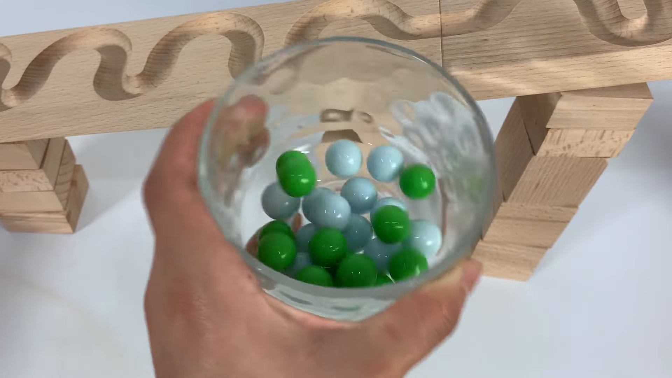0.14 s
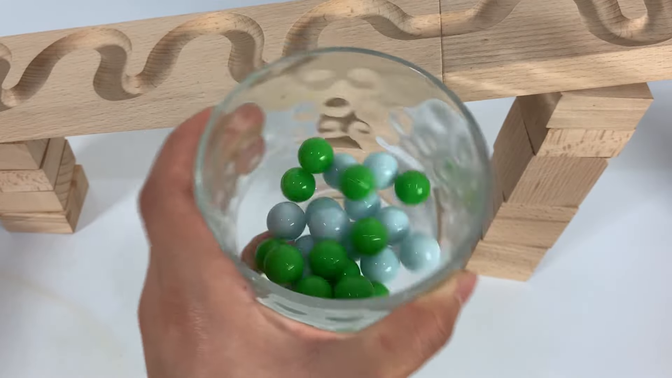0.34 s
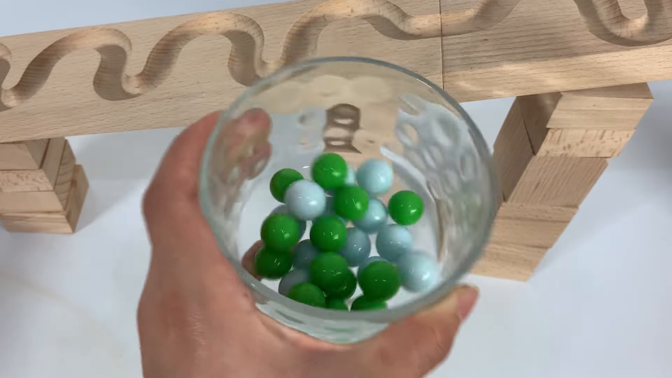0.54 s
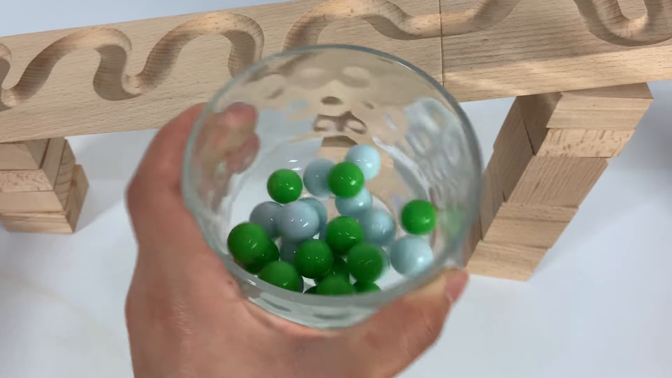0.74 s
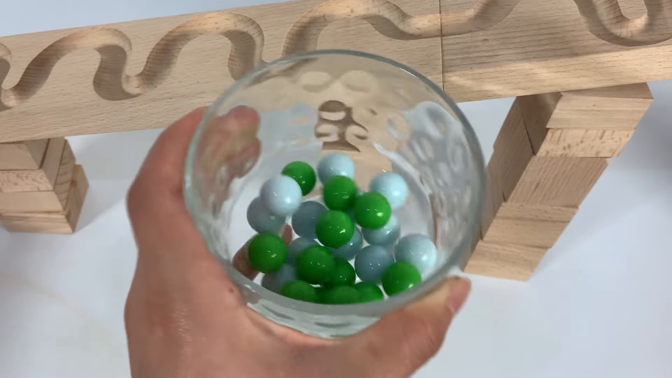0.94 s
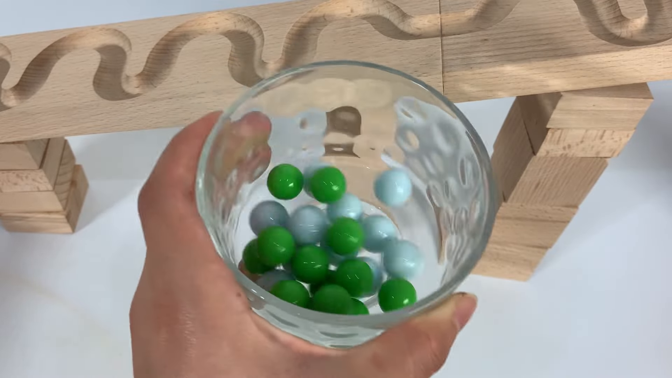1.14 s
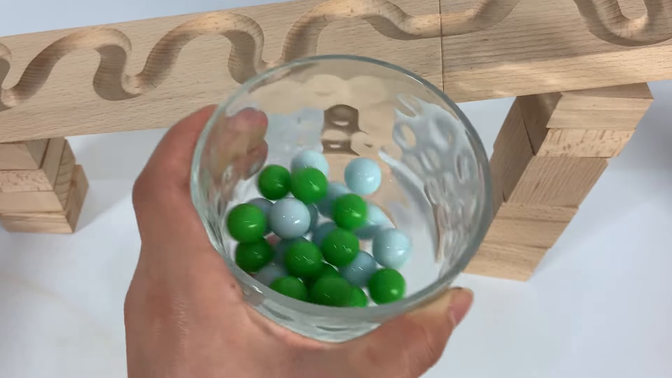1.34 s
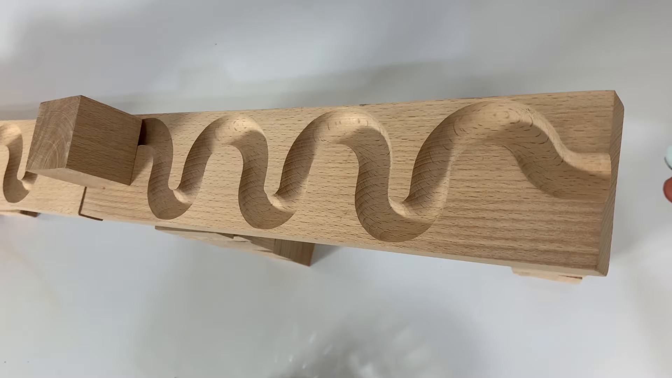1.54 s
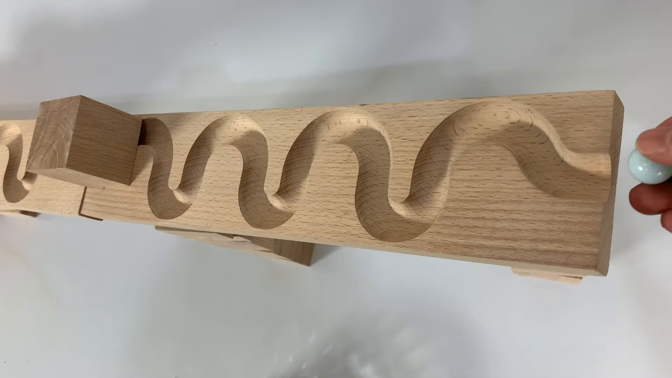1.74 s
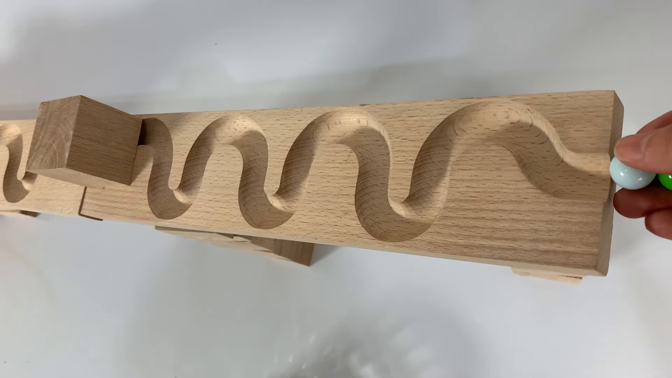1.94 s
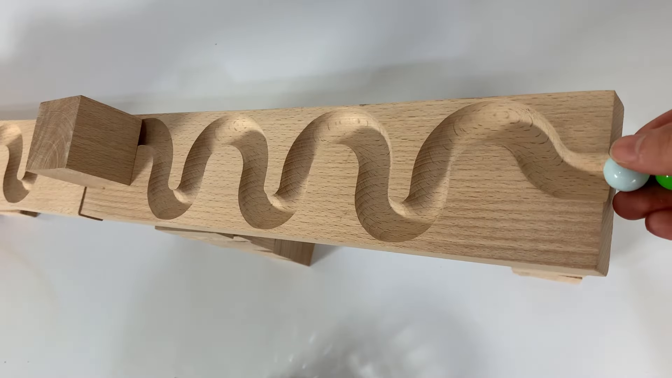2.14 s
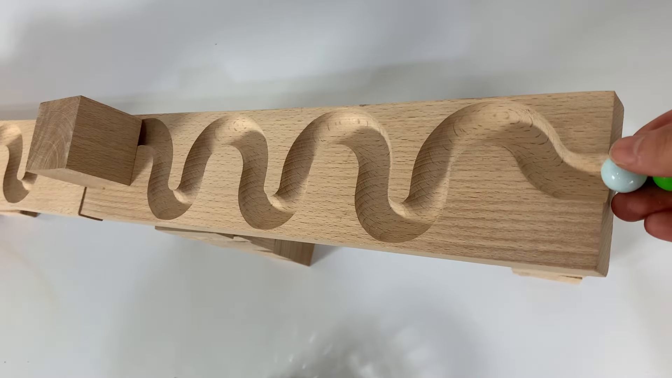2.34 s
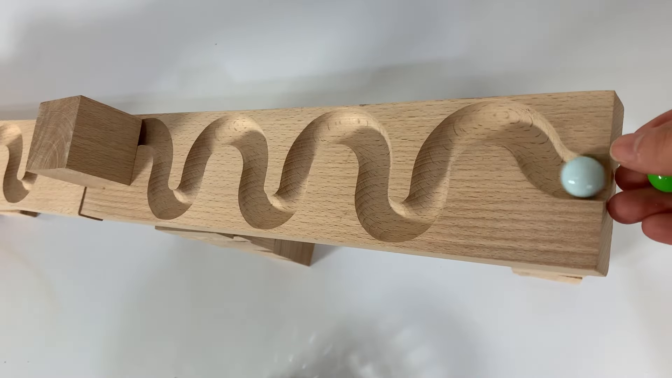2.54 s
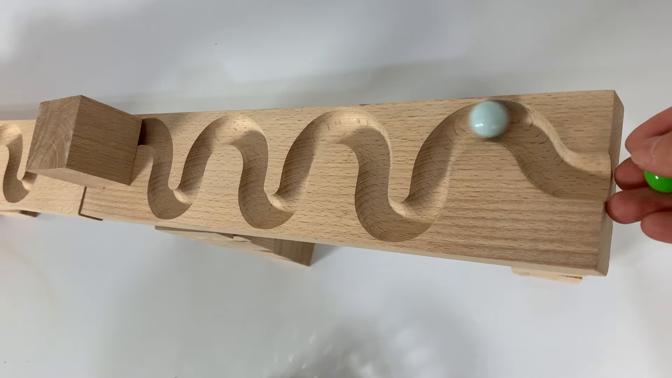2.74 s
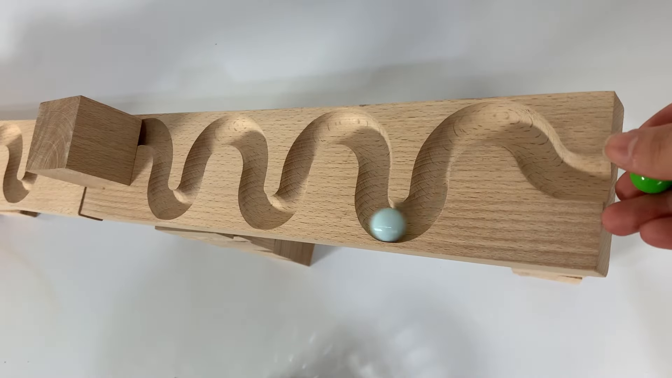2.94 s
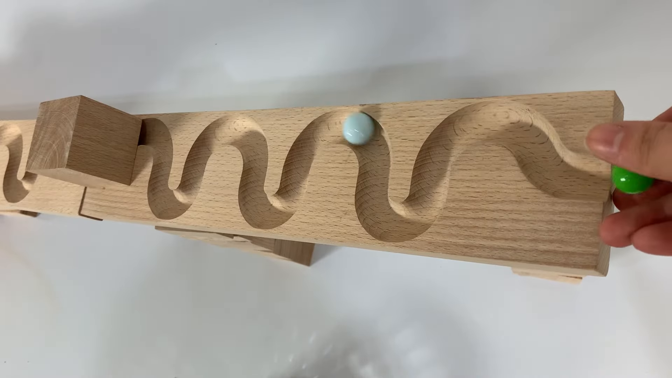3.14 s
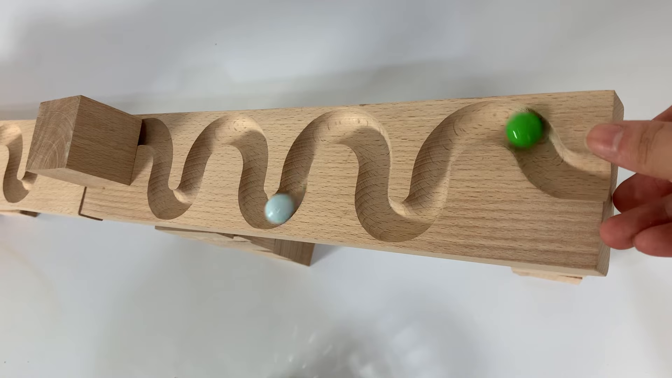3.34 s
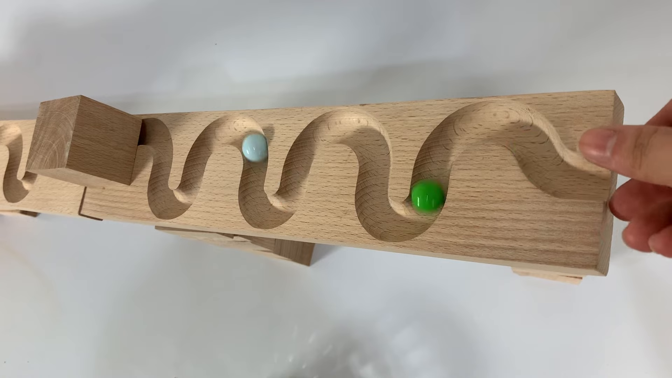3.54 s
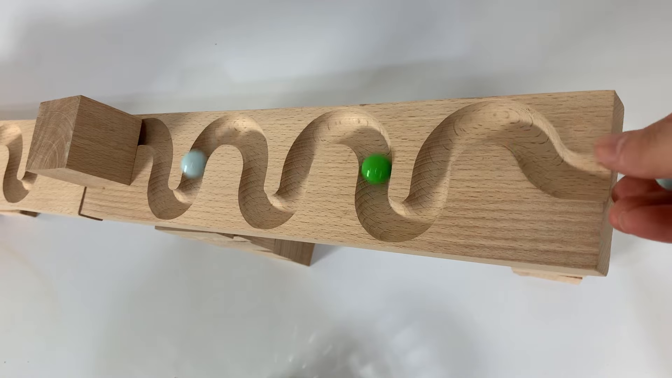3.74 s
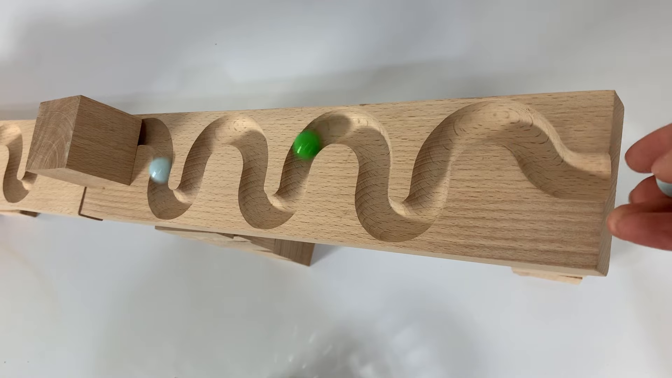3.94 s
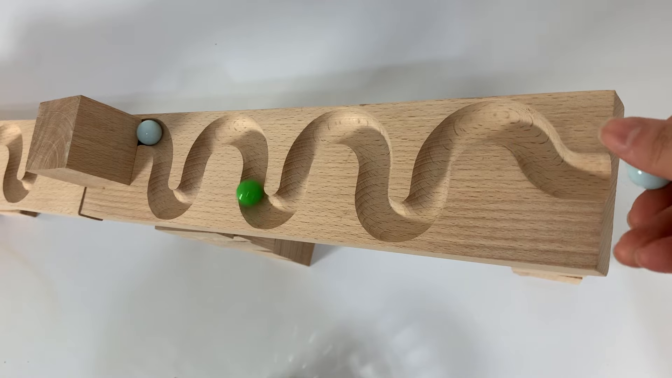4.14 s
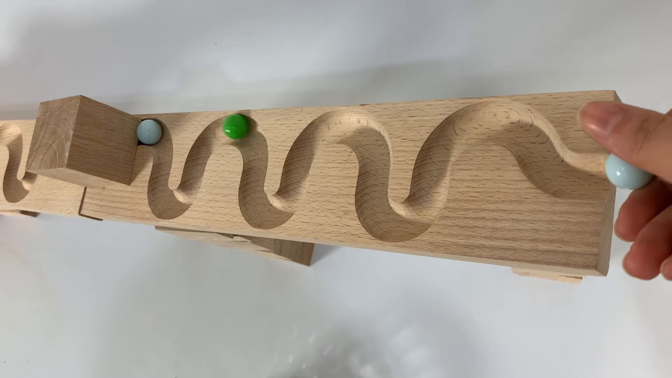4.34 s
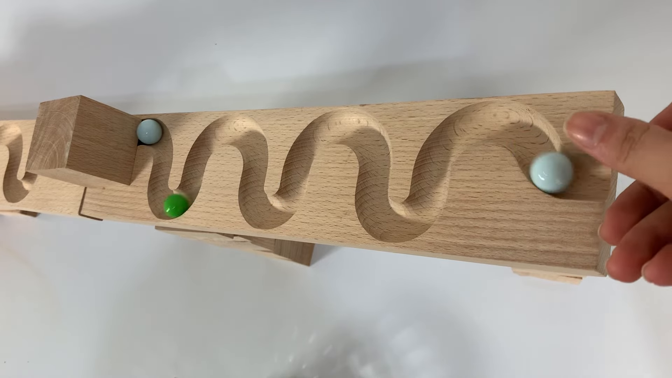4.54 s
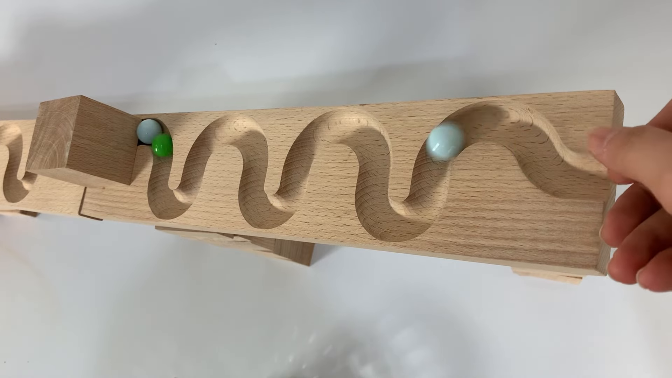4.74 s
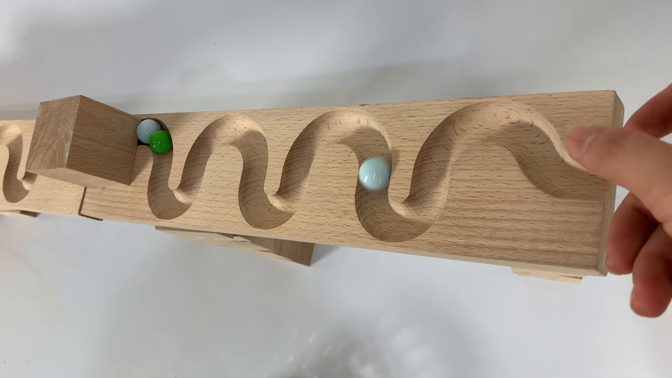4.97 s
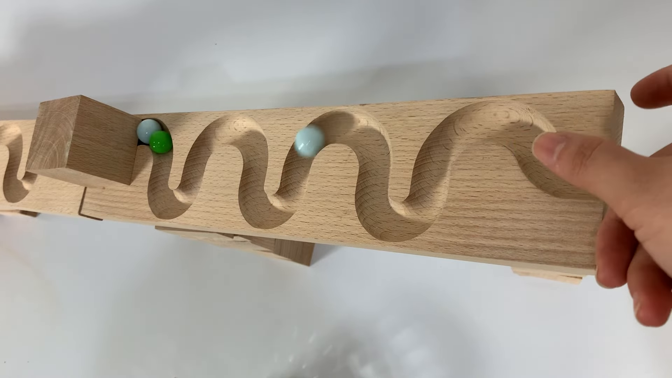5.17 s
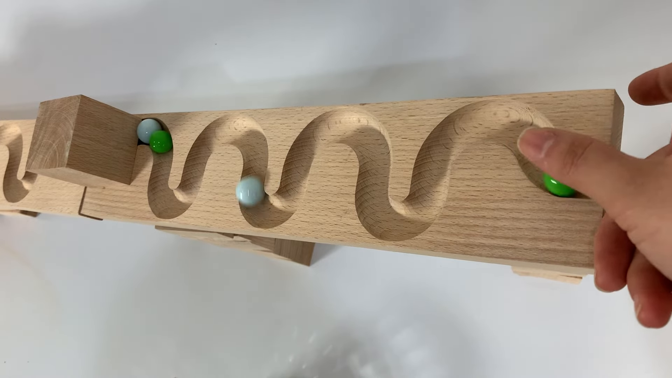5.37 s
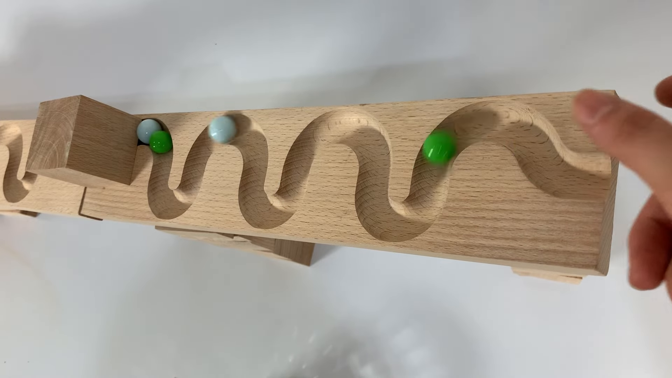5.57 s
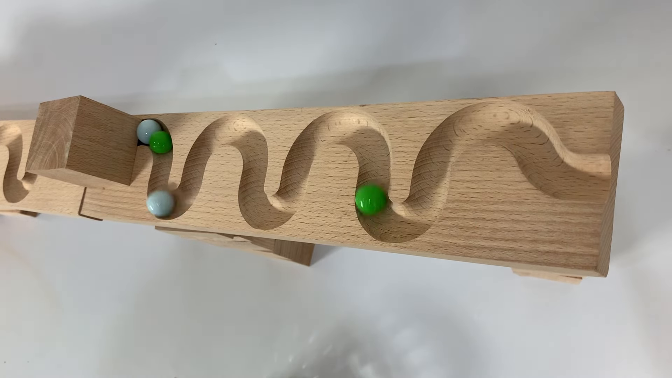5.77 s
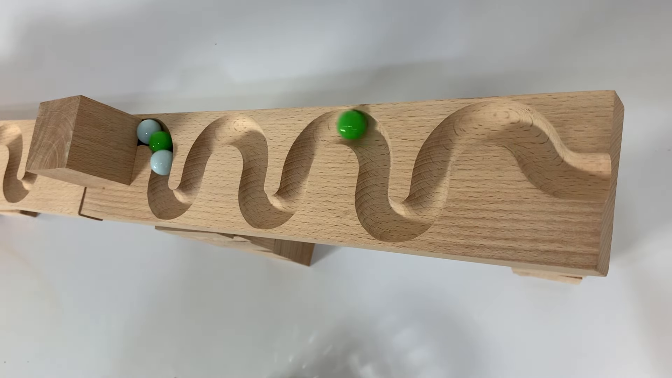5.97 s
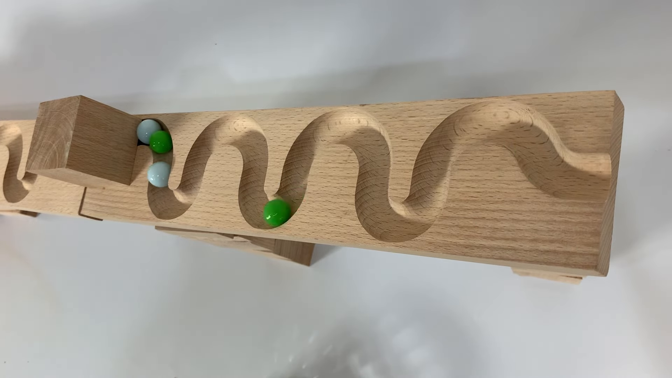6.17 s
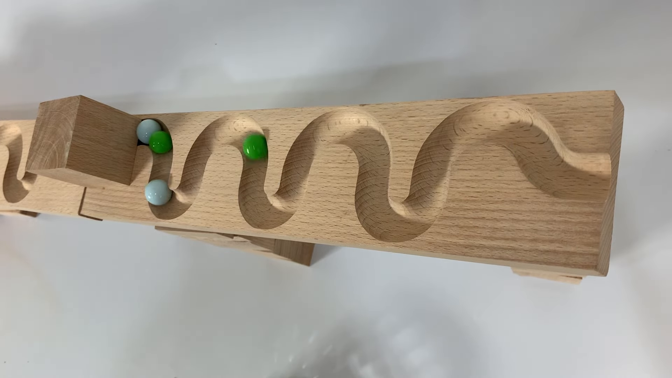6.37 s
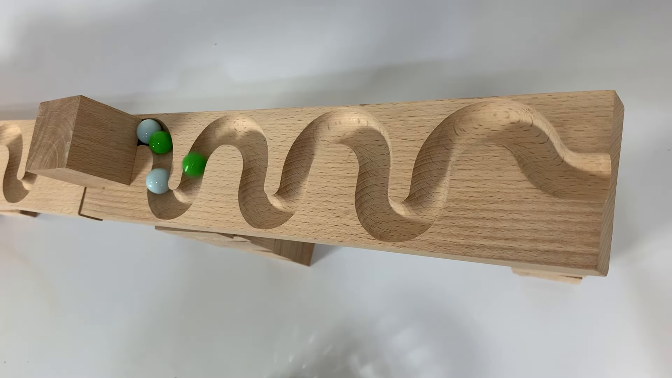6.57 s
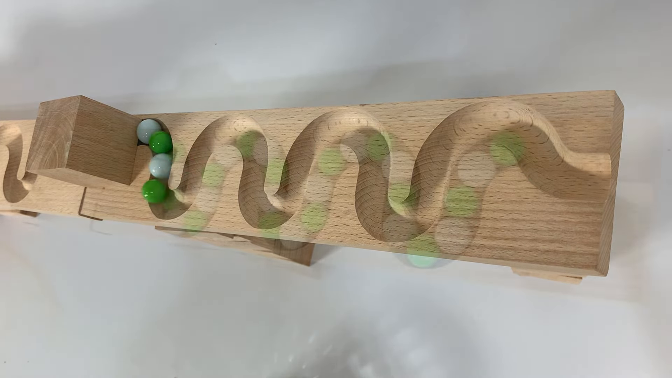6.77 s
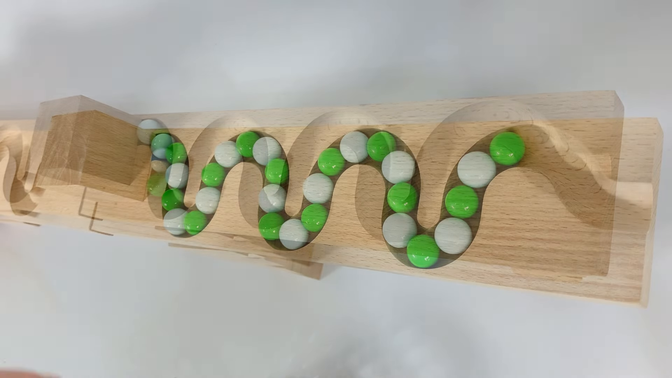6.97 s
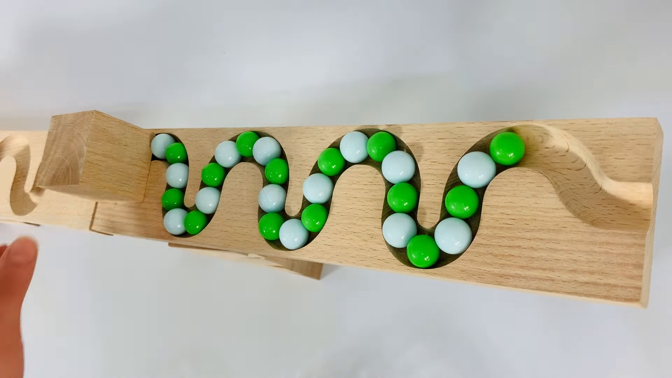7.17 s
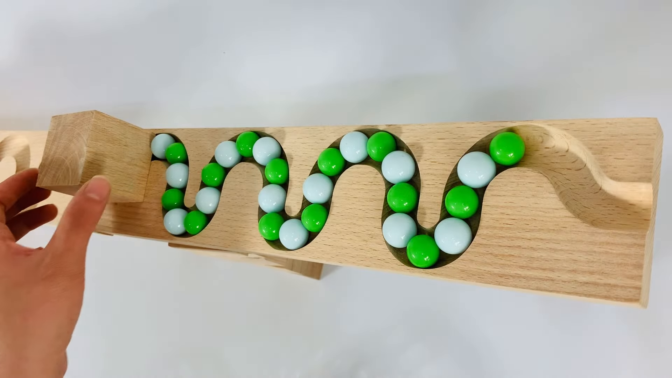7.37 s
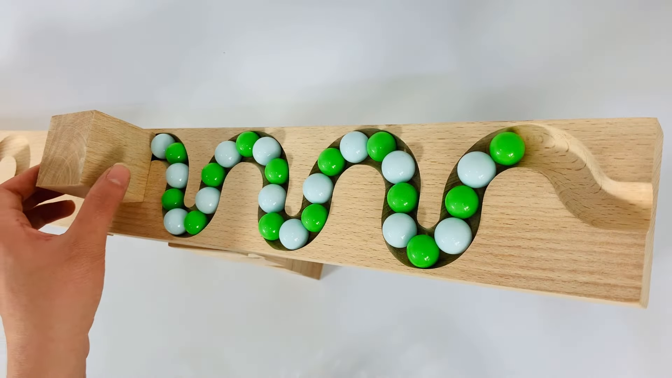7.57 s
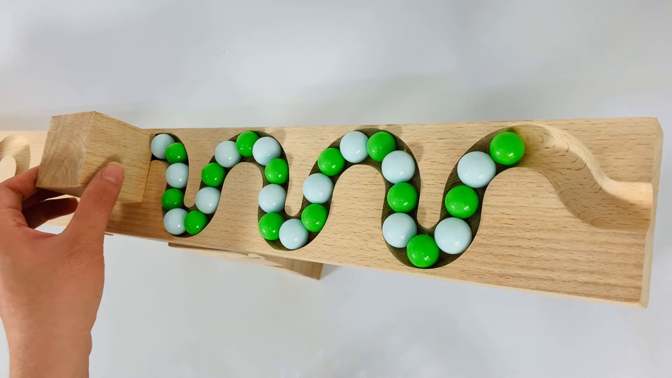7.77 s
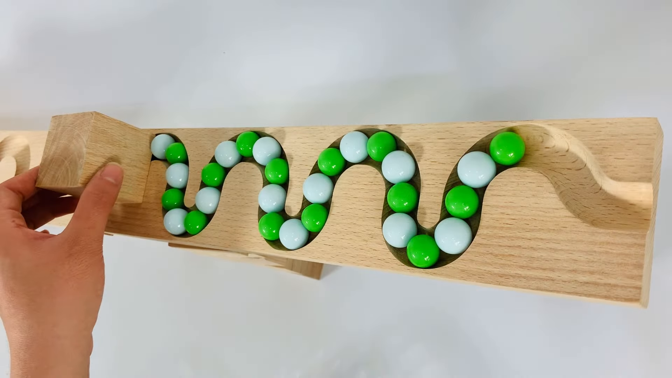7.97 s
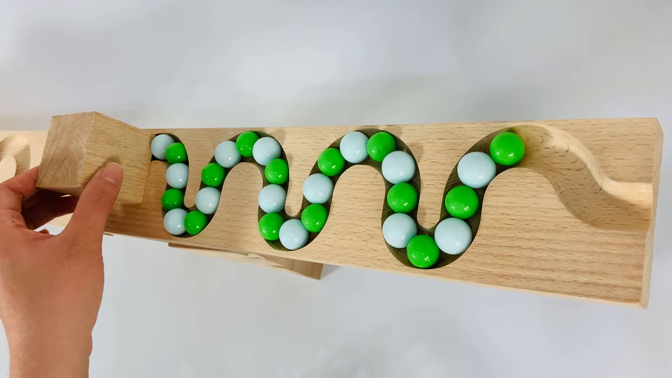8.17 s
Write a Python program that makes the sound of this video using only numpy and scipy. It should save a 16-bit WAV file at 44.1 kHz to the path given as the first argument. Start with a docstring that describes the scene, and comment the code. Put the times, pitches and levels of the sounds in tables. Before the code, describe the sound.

Glass marbles swirl in a hand-held tumbler with a bright, dense, pulsing rattle and sharp clinks. After a second and a half it stops, and marbles run one by one down a winding groove in a wooden board, rumbling and knocking at the bends, with hard clacks at the stop block. A small hard room, close stereo microphone, faint low rumble, nearly quiet at the end.

```python
"""Glass marbles clink and clatter as they are swirled in a hand-held drinking glass; then they run one by one
down a winding groove in a wooden board, knocking at its bends and clacking into marbles at the stop block.
Glass and wood are banks of decaying modes struck by clicks and noise; marble on marble is a short noise burst.
A small hard room, made of decaying noise bands, rings behind the hits, and a low rumble lies under all."""
import sys
import numpy as np
from scipy import signal
from scipy.fft import rfft, irfft, next_fast_len
from scipy.io import wavfile
from scipy.ndimage import uniform_filter1d

SR = 44100
rng = np.random.default_rng(int(sys.argv[2]) if len(sys.argv) > 2 else 0)


def transcribe(u):
    """Save the signal u as a 16-bit wav file named by the first command-line argument.

    u: samples, shape (n,) or (channels, n), limited to [-1, 1]; the rate is SR.
    q: integer samples, one column per channel.
    """
    v = np.clip(np.atleast_2d(u).T, -1, 1)
    q = np.round(v * 32767).astype(np.int16)
    wavfile.write(sys.argv[1], SR, q)


N = 362061
SIZE = next_fast_len(N)   # transform length in samples

# Loudest blows of marbles against the groove.
# Each row: time in seconds, relative level in dB, hardness (tilt of the blow's spectrum) in dB per octave.
KNOCK_EVENTS = [(2.585, -42.5, -19), (2.637, -40, -16.5), (2.731, -41, -11.5), (2.7829, -30.5, -4),
                (2.852, -24.5, -5.5), (3.0202, -35, -16), (3.1817, -19, -2.5), (3.2186, -25, 7),
                (3.233, -37, 14), (3.293, -30, -8), (3.3202, -26, 1), (3.358, -17.5, 1.5), (3.444, -34, -3),
                (3.464, -30.5, -11), (3.4776, -27.5, 1), (3.557, -42.5, 12.5), (3.597, -32, -4),
                (3.6364, -33, -2.5), (3.687, -30, -16), (3.705, -25.5, -11.5), (3.7894, -23, 9),
                (3.8175, -17, -1.5), (3.8585, -18.5, 0), (3.8876, -21.5, -6.5), (4.012, -28.5, 0),
                (4.025, -27.5, 6), (4.0565, -24.5, 4.5), (4.069, -21, 0.5), (4.093, -27, 5.5),
                (4.1468, -28.5, 6), (4.4024, -38, -13.5), (4.4699, -5.5, 5.5), (4.517, -15, 10),
                (4.7915, -23, 1), (4.8152, -20.5, 1.5), (4.8505, -30, -13), (4.873, -41, -2),
                (4.9014, -37.5, -19), (4.9576, -37.5, -20.5), (5.102, -45, -16), (5.1601, -30.5, -2),
                (5.1964, -36.5, 3), (5.241, -42.5, -9), (5.2592, -22, -7), (5.2984, -19.5, 4.5),
                (5.33, -16.5, 12), (5.382, -19.5, 1), (5.547, -29.5, 6.5), (5.647, -19.5, -10),
                (5.689, -14, 5.5), (5.7083, -17, -4.5), (5.7233, -19, 11.5), (5.762, -21, -5),
                (6.0785, -31.5, 0), (6.1878, -20, 8), (6.2173, -23.5, 4), (6.2955, -30, 3.5),
                (6.439, -47, -12), (6.5073, -40.5, -14), (6.569, -37.5, -9), (6.603, -30.5, -15.5),
                (6.6294, -37, 11), (6.6794, -22.5, 1.5), (6.79, -20.5, -3.5), (7.021, -62, -23.5),
                (7.065, -58, -19), (7.1113, -46, -9)]


def glass():
    """Modal excitation: single clinks and a dense random patter set the glass's resonances ringing."""
    # Flicks of the wrist that throw the marbles together. Each row: time in seconds, surge level in dB.
    flicks = [(0.05, -31), (0.152, -37.5), (0.253, -35), (0.346, -34), (0.447, -33), (.54, -35),
              (0.669, -35), (0.751, -38.5), (0.844, -35), (0.959, -38), (1.085, -34.5), (1.176, -37.5),
              (1.29, -43)]
    # Loudest marbles against the glass wall.
    # Each row: time in seconds, relative level in dB, upper modes over lower modes in dB.
    clink_events = [(0.038, -5, 0), (0.0967, -4.5, -3), (0.12, -10.5, -0.5), (0.1456, -9.5, 0),
                    (0.161, -5.5, -3.5), (0.182, -15, 2.5), (0.2202, -15, 2), (0.2349, -12.5, -2),
                    (0.2568, -9.5, -8.5), (0.321, -12, 10), (0.3638, -10.5, -3), (0.396, -12.5, 3.5),
                    (0.4379, -14, -4), (0.4886, -8, 6.5), (0.5151, -9, 13), (0.566, -7.5, 2),
                    (0.6373, -16, 8), (0.6625, -15.5, -1), (0.6983, -7.5, -1), (0.789, -16.5, -2),
                    (0.841, -16.5, -7), (0.8857, -14.5, -9), (0.9236, -13, -9), (0.9926, -19.5, 14),
                    (1.0226, -13, -12.5), (1.0543, -14, 10), (1.2753, -15, 3), (1.3024, -8.5, 4),
                    (1.3424, -10, 4)]
    # Resonances of the glass. Each row: frequency in Hz, level in dB, decay by 60 dB in seconds.
    glass_modes = [(3190, -18, 0.046), (9987, -3, 0.056), (9890, -12, 0.012), (12690, 1.5, 0.043),
                   (15540, -21.5, 0.012)]
    surge_s, between_db = 0.015, -38.5   # standard deviation of a surge, activity between surges

    t = np.arange(N) / SR
    surges = sum(amp(level_db) * np.exp(-.5 * ((t - s) / surge_s) ** 2) for s, level_db in flicks)
    swirl = (surges + amp(between_db)) * (t < 1.6)
    s, peak_db, upper_db = np.transpose(clink_events)
    ringing = 0
    for hz, level_db, t60 in glass_modes:
        lean_db = upper_db * np.clip(np.log2(hz / 11200) * 3, -.5, .5)
        clinks = blows(s, peak_db + lean_db - 10.0)
        clinks = clinks + bursts(s, peak_db + lean_db - 6, length_s=0.0035)
        patter = amp(-13.0) * swirl * grains(per_s=360, spread_db=4.0)
        ringing = ringing + amp(level_db) * ring(clinks + patter, hz, t60)
    return ringing + marble_clatter(swirl)


def marble_clatter(swirl):
    """Shot noise: many random impacts of marble on marble merge into a coloured clatter that follows the swirl."""
    # Spectrum of marble on marble. Each row: frequency in Hz, relative density in dB per Hz.
    clatter_spectrum = [(150, -37.5), (650, -14.5), (1500, -18), (2000, -21.5), (7600, -9.5), (8700, -5),
                        (10500, -9.5), (11700, -5), (13200, -4), (14600, -11.5), (15600, -6)]
    clatter = rms_one(coloured(grains(per_s=1100, spread_db=-0.5), clatter_spectrum))
    return amp(7.5) * swirl * clatter


def board():
    """Modal excitation: thuds and rolling weight drive low modes, knocks and chatter high ones; thuds reach all."""
    # Resonances of the wood. Each row: frequency in Hz, level in dB, decay by 60 dB in seconds.
    board_modes = [(97.6, -11, 0.1), (137, -11.5, 0.93), (202, -11, 0.49), (225.8, -4.5, 0.14),
                   (289.8, -5, 0.16), (394.3, -12, 0.19), (558, -14, 0.099), (664, -19, 0.18),
                   (740, -5.5, 0.016), (1596, -8, 0.034), (1677, -6.5, 0.07), (1970, 8.5, 0.0015),
                   (2490, 4, 0.011), (3210, 6, 0.012), (3910, -1, 0.0091), (4414, -7, 0.037)]
    # Marbles set down or stopped, which shake the whole board. Each row: time in seconds, relative level in dB.
    thuds = [(2.14, -41.5), (4.4721, -16), (4.516, -17.5), (5.331, -22), (5.689, -35)]
    shaken_rumble_db, shaken_chatter_db = -10, -25.5   # share of the roughness in low and high modes
    even_db_per_octave, rough_db_per_octave = -17.5, -16.5   # an even run is duller than a rough one
    wander_db, wander_hz = 3.0, 12   # the moving contact point reaches each mode unevenly

    rumble_power, chatter_power, shaken = rolling()
    s, peak_db, hardness = np.transpose(KNOCK_EVENTS)
    thud_s, thud_db = np.transpose(thuds)
    hops = grains(per_s=300, spread_db=4.5) * amp(3.7 * drift(25))   # small hops strike every mode at once
    ringing = 0
    for hz, level_db, t60 in board_modes:
        octaves = np.log2(max(hz, 900) / 3000)
        thud_tilt_db = -21 * octaves - 34 + 3.9 * min(np.log2(hz / 700), 0)
        drive = blows(thud_s, thud_db + thud_tilt_db)
        if hz < 900:
            weight = np.sqrt(rumble_power + shaken * amp(shaken_rumble_db) ** 2)
            wander = amp(wander_db / 2 * drift(wander_hz) - 36.0)   # low modes wander half as far
            pressing = rng.standard_normal(N) + 0.51 * hops * rng.standard_normal(N)
            drive = drive + weight * wander * pressing
        else:
            chatter = softly(hops * rng.normal(1, .5, N), hz) + 0.3 * rng.standard_normal(N)
            even = chatter_power * amp(even_db_per_octave * octaves) ** 2
            rough = shaken * amp(shaken_chatter_db + rough_db_per_octave * octaves) ** 2
            wander = amp(wander_db * drift(wander_hz) - 38.5)
            drive = drive + np.sqrt(even + rough) * wander * chatter
            strength_db = peak_db + hardness * octaves - 8.5 + rng.normal(0, 2.5, len(s))
            drive = drive + softly(blows(s, strength_db + 1.5), hz)
            drive = drive + bursts(s, strength_db - 5.5, length_s=0.0076)
        ringing = ringing + amp(level_db) * ring(drive, hz, t60)
    # Wood is soft: no contact is quite sharp.
    ringing = signal.sosfilt(signal.butter(2, 6500, fs=SR, output="sos"), ringing)
    # The contact itself, before the wood rings.
    crack = bursts(s, peak_db + 7.5 + 1.57 * hardness, length_s=0.0025)
    return ringing + signal.sosfilt(signal.butter(3, [1100, 5500], "band", fs=SR, output="sos"), crack)


def rolling():
    """Incoherent sources add in power: rumble and chatter of all runs, and the roughness that knocks leave."""
    # Runs of single marbles down the groove.
    # Each row: let go in seconds, stopped in seconds, relative level of board rumble in dB, of groove chatter in dB.
    runs = [(2.511, 4.105, -32, -51), (3.175, 4.763, -37.5, -51), (4.448, 5.88, -31, -44.5),
            (5.328, 6.78, -38.5, -49.5)]
    gather_s, settle_s = 0.042, 0.06   # speed is gathered, motion dies at the stop (time constants)
    away_db = -0.5   # dB per second as the marble rolls away
    shaken_s, shaken_share = 0.026, 0.64   # decay of the roughness, share of the knock's dB it follows

    t, rumble_power, chatter_power = np.arange(N) / SR, 0, 0
    for start, stop, rumble_db, chatter_db in runs:
        gathering = 1 - np.exp(-np.maximum(t - start, 0) / gather_s)
        settling = np.exp(-np.maximum(t - stop, 0) / settle_s)
        moving = gathering * settling * amp(away_db * (t - start))
        chatter_onset = np.clip((t - start) / gather_s - .5, 0, 1)
        rumble_power = rumble_power + (moving * amp(rumble_db)) ** 2
        chatter_power = chatter_power + (moving * amp(chatter_db)) ** 2 * chatter_onset ** 2
    s, peak_db, _ = np.transpose(KNOCK_EVENTS)
    knock_power = blows(s, shaken_share * peak_db) ** 2
    shaken = signal.lfilter([1], [1, -np.exp(-2 / (shaken_s * SR))], knock_power)
    shaken = uniform_filter1d(shaken, size=SR // 100, origin=SR // 200 - 1)   # mean of the past 10 ms
    return rumble_power, chatter_power, np.abs(shaken)


def clacks():
    """Brief elastic contact: glass spheres meet in a very short, bright, band-limited burst."""
    # Marble on marble. Each row: time in seconds, relative peak level in dB, centre of the band in Hz.
    clack_events = [(3.8588, -37.5, 5700), (4.469, -27.5, 5600), (4.7578, -28, 5210), (5.3302, -27, 4520),
                    (5.6876, -30.5, 5200), (5.872, -25.5, 5770), (6.7367, -33.5, 6840), (6.812, -38, 7600),
                    (7.175, -35.5, 9600)]
    contact_s = 0.0001

    out, length = np.zeros(N), SR // 20
    t = np.arange(length) / SR / contact_s   # in lengths of a contact
    noises = rng.standard_normal((len(clack_events), length))
    for (s, peak_db, hz), noise in zip(clack_events, noises):
        band = signal.butter(2, [hz * .55, hz * 1.9], "band", fs=SR, output="sos")
        burst = signal.sosfilt(band, noise * t * np.exp(-t))
        out[round(s * SR):][:length] += amp(peak_db + 15) * burst / np.max(np.abs(burst))
    return out


def block():
    """Friction noise: the stop block scrapes briefly on the board, broad, dull and uneven."""
    # A hand takes hold of the stop block. Each row: time in seconds, relative level in dB.
    touches = [(7.173, -22.5), (7.187, -30), (7.197, -38)]
    s, peak_db = np.transpose(touches)
    scrape = 10 * bursts(s, peak_db, length_s=0.0025)
    return signal.sosfilt(signal.butter(2, [1000, 3000], "band", fs=SR, output="sos"), scrape)


def room(x, gap_s):
    """Diffuse reverberation: octaves of noise die at their own rate, lower ones more alike on both sides."""
    # Reverberation time. Each row: frequency in Hz, decay by 60 dB in seconds.
    room_t60 = [(500, 0.68), (4000, 0.33), (8000, 0.39), (14000, 0.062)]
    t, tail = np.arange(SR // 2) / SR, 0
    for low in 360 * 2. ** np.arange(6):
        band = signal.butter(2, [low, min(2 * low, 19000)], "band", fs=SR, output="sos")
        shared, *own = signal.sosfilt(band, rng.standard_normal((3, len(t))))
        noise = (shared * 350 / low + np.array(own)) / np.hypot(350 / low, 1)
        tail = tail + noise * amp(-60 * t / at_hz(room_t60, low * 1.4))
    tail = tail * (1 - np.exp(-t / gap_s))   # reflections build up after the direct sound
    tail = tail / np.sqrt(np.sum(tail ** 2) / 2)   # unit energy, mean of the two sides
    return signal.fftconvolve(x[None], tail, axes=1)[:, :N]


def rumble():
    """Partial coherence: low noise of the building, more alike in both ports the lower it is."""
    # Spectrum of the rumble. Each row: frequency in Hz, relative density in dB per Hz.
    rumble_spectrum = [(25, -29), (59, 1), (76, -9), (100, 2.5), (122, -12), (148, -5.5), (200, -21),
                       (450, -31.5), (1100, -59.5), (16000, -68.5)]
    # Left-right likeness of the rumble. Each row: frequency in Hz, correlation (1 = the same on both sides).
    likeness = [(125, 1), (250, 0.6), (1000, 0.15)]
    # Course of the rumble. Each row: time in seconds, level in dB.
    rumble_course = [(1.535, -61.5), (1.549, -45.5), (2.599, -43), (6.999, -41), (8.2, -43)]

    mid, side = rng.standard_normal((2, N))
    limited = np.clip(likeness, 0, [SR, .99])
    side_db = [(hz, 10 * np.log10((1 - a) / (1 + a))) for hz, a in limited]
    noise = coloured(mid + coloured(side, side_db) * [[1], [-1]], rumble_spectrum)
    level_db = np.interp(np.arange(N) / SR, *np.transpose(rumble_course))
    return amp(level_db) * rms_one(noise)


def ring(clicks, hz, t60):
    """Damped resonator: a unit click sets a decaying sine of height 1 ringing."""
    r, w = amp(-60 / (t60 * SR)), 2 * np.pi * hz / SR
    return signal.lfilter([0, np.sin(w)], [1, -2 * r * np.cos(w), r * r], clicks + 1e-18)


def softly(clicks, hz):
    """Compliant contact: yielding wood feeds a mode over some cycles instead of all at once."""
    contact_s = 0.0054   # the feed dies by 60 dB in this time
    return ring(clicks, hz, contact_s) * 2 * np.log(1000) / (contact_s * SR)


def blows(times, levels_db):
    """Ideal impulses: a click train with random signs."""
    clicks = np.zeros(N)
    clicks[np.round(times * SR).astype(int)] = amp(levels_db) * rng.choice([-1, 1], len(times))
    return clicks


def bursts(times, levels_db, length_s):
    """Rattling contact: each blow is noise that swells and dies within a few length_s."""
    r = np.exp(-1 / (length_s * SR))
    clicks = np.abs(blows(times, levels_db)) + 1e-18
    swell = signal.lfilter([(1 - r) ** 1.5 * 2], [1, -2 * r, r * r], clicks)
    return swell * rng.standard_normal(N)


def grains(per_s, spread_db):
    """Random impacts: independent clicks of uneven size, scaled to rms 1."""
    sizes = amp(spread_db * np.minimum(rng.exponential(1, N), 4)) * rng.choice([-1, 1], N)
    return rms_one(sizes * (rng.random(N) < per_s / SR))


def drift(hz):
    """Slow random modulation: straight lines join random points of spread 1, at most 29 a second."""
    knots = np.arange(int(N / SR * 30) + 2)
    return np.interp(np.arange(N) / SR * min(hz, 29), knots, rng.standard_normal(len(knots)))


def coloured(x, spectrum):
    """Linear filtering: weights each frequency of x by a curve in dB."""
    hz = np.maximum(np.arange(SIZE // 2 + 1) * SR / SIZE, 1)
    return irfft(rfft(x, SIZE) * amp(at_hz(spectrum, hz)), SIZE)[..., :N]


def at_hz(points, hz):
    """Logarithmic pitch scale: reads a curve between its points along log frequency."""
    return np.interp(np.log(hz), np.log(np.array(points)[:, 0]), np.array(points)[:, 1])


def amp(db):
    """Decibel law: amplitude ratio of a level in dB."""
    return 10 ** (np.asarray(db) / 20)


def rms_one(x):
    """Mean-square normalisation: scales x to rms 1."""
    return x / np.sqrt(np.mean(x ** 2) + 1e-20)


def scene():
    """Superposition: direct and reverberant sound add, first for the glass, then for the board, over the rumble."""
    # Fade-out of the glass, then of the board. Each row: start in seconds, end in seconds.
    glass_fade = (1.435, 1.558)
    board_fade = (7.197, 7.224)

    t = np.arange(N) / SR
    swirl, wood, marbles = glass(), board() + block(), clacks()
    first = swirl + amp(-11) * room(swirl, gap_s=.003)
    # The walls swallow the top of the clacks.
    dulled = signal.sosfilt(signal.butter(2, 7100, fs=SR, output="sos"), marbles)
    second = wood + marbles + room(amp(-5.5) * wood + amp(1.0) * dulled, gap_s=0.001)
    first = first * np.interp(t, glass_fade, (1, 0))
    second = second * np.interp(t, board_fade, (1, 0))
    return first + second + rumble()


def record(dry):
    """Phase difference and band limits: the ports differ in phase; deepest bass and top are cut."""
    # The two microphone ports. Each row: frequency in Hz, phase by which the left one leads in radians.
    port_phase = [(0, 0), (700, 0.5), (1700, 1.44), (2500, 2), (3800, 0.97), (5200, 1.56), (6200, 1.5),
                  (8600, -2.5), (10000, -6), (12700, -11), (16000, -18)]
    hz = np.arange(SIZE // 2 + 1) * SR / SIZE
    turn = np.exp(.5j * np.interp(hz, *np.transpose(port_phase)))   # each side turns by half
    dry = irfft(rfft(dry, SIZE) * np.array([turn, turn.conj()]), SIZE)[:, :N]
    dry = signal.sosfilt(signal.butter(2, 45, "high", fs=SR, output="sos"), dry)
    return signal.sosfilt(signal.ellip(10, .5, 70, 15750, fs=SR, output="sos"), dry)


dry = scene()
out = record(dry)
transcribe(out)
```